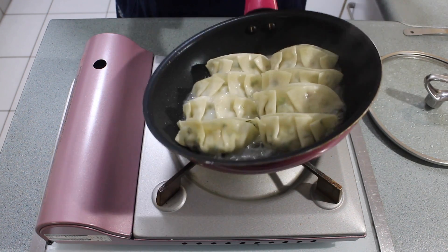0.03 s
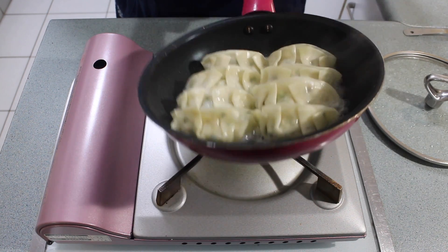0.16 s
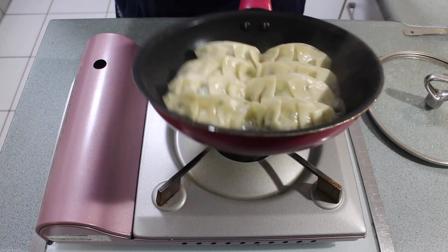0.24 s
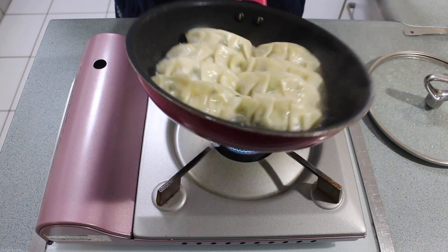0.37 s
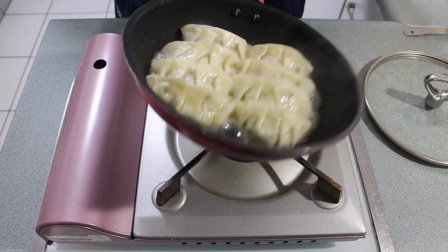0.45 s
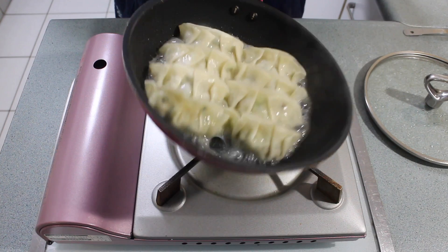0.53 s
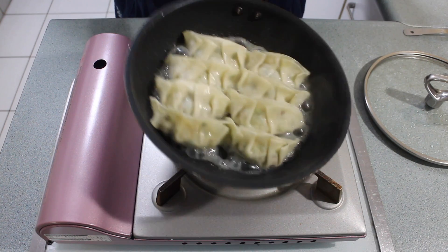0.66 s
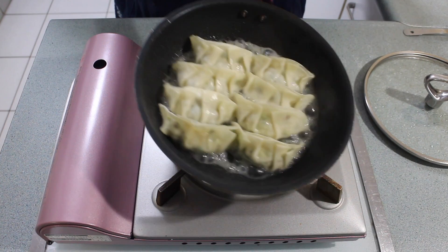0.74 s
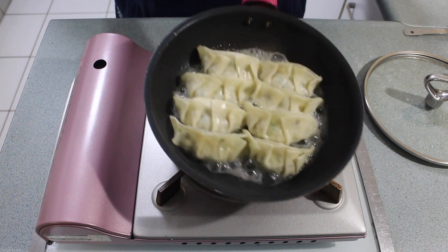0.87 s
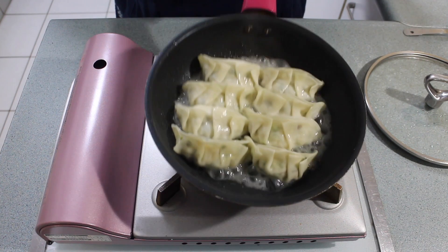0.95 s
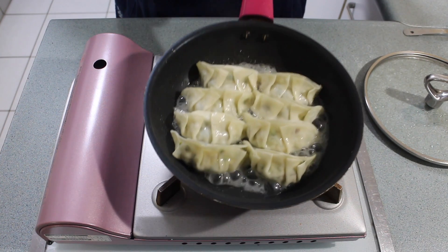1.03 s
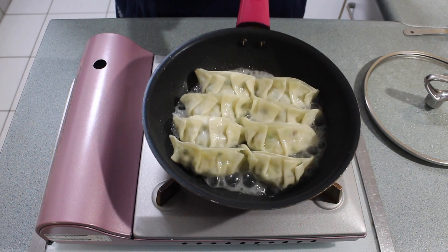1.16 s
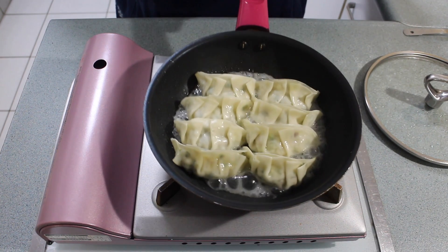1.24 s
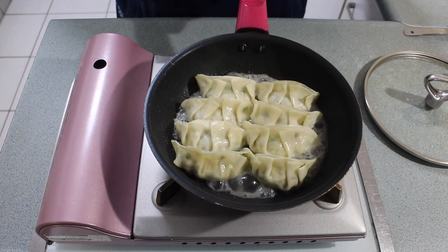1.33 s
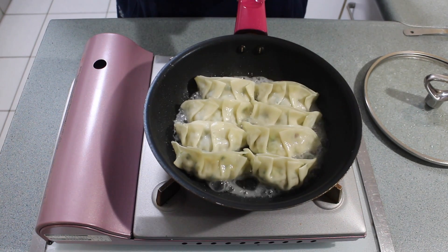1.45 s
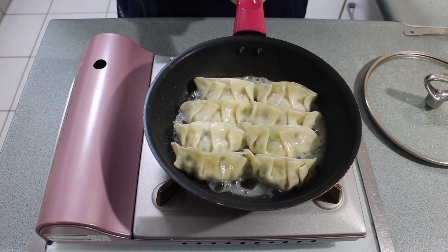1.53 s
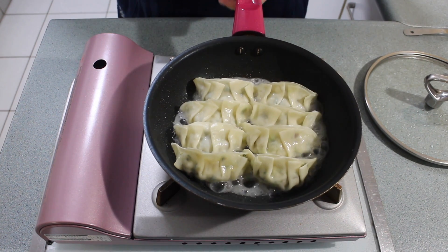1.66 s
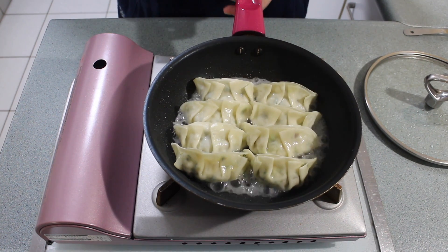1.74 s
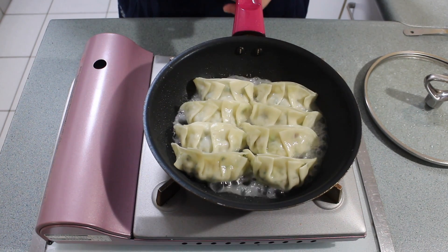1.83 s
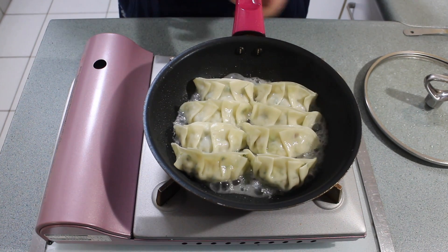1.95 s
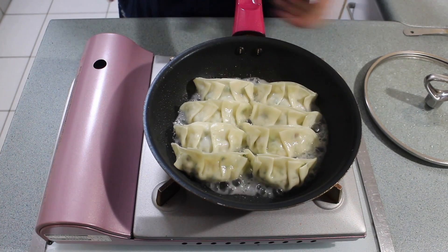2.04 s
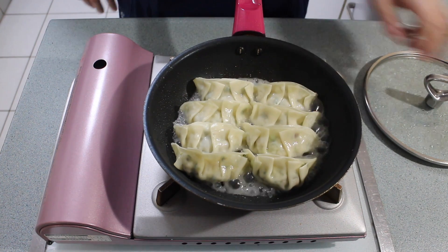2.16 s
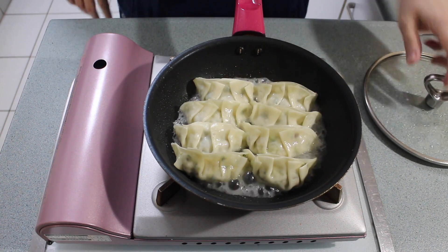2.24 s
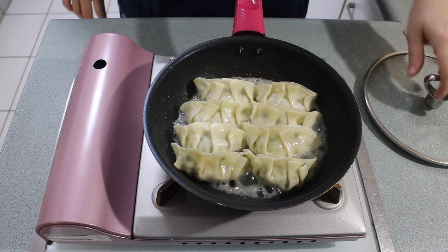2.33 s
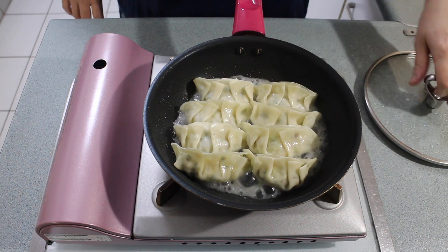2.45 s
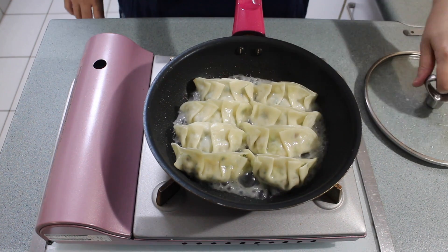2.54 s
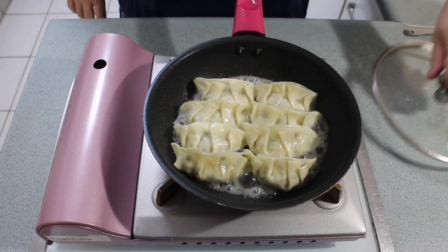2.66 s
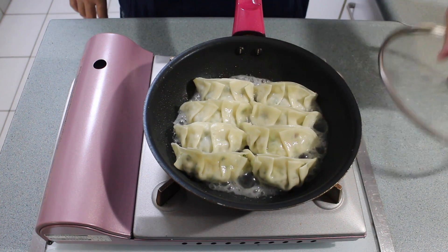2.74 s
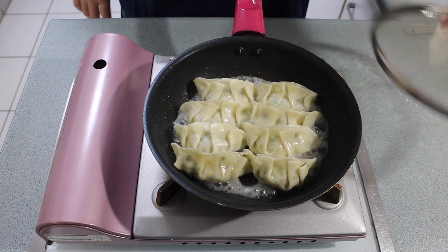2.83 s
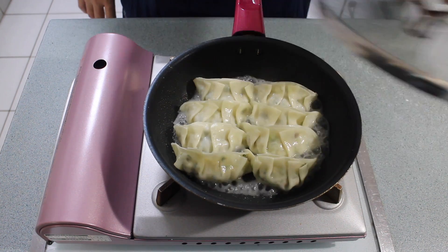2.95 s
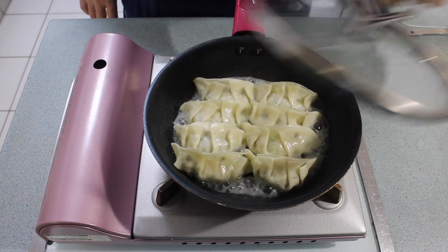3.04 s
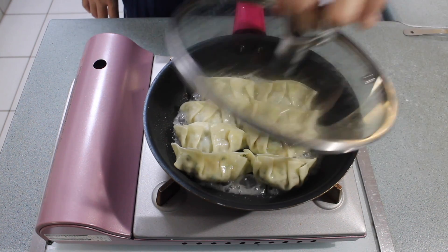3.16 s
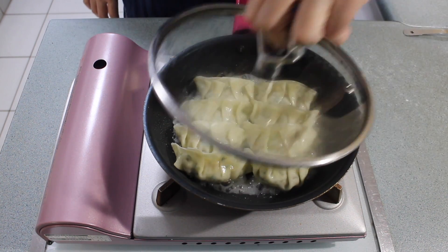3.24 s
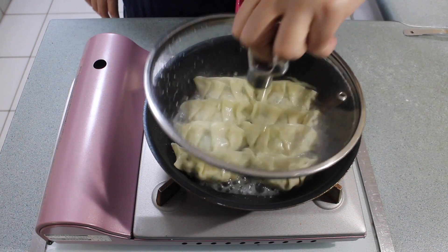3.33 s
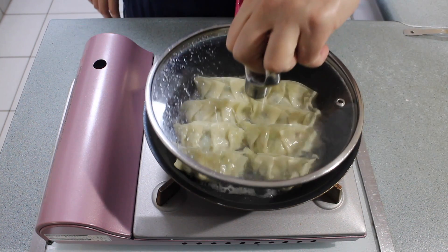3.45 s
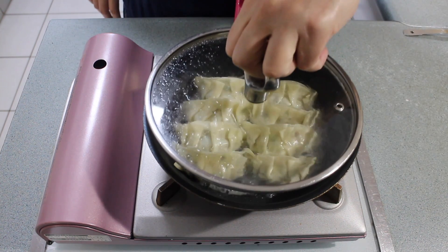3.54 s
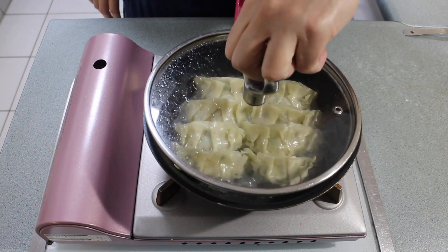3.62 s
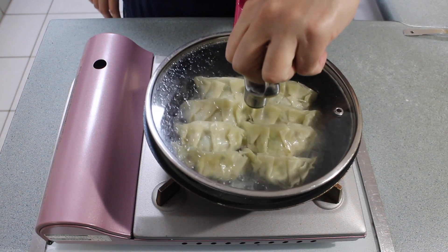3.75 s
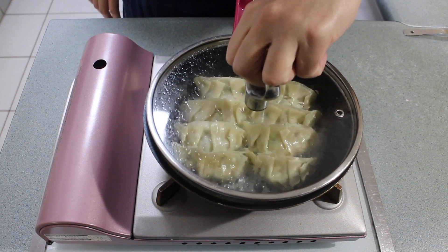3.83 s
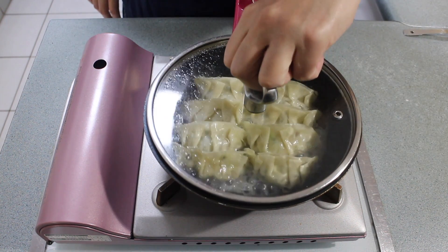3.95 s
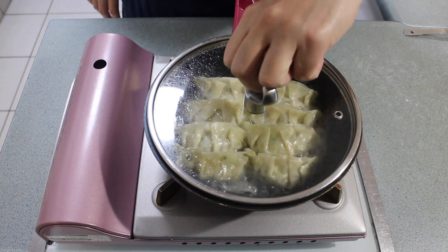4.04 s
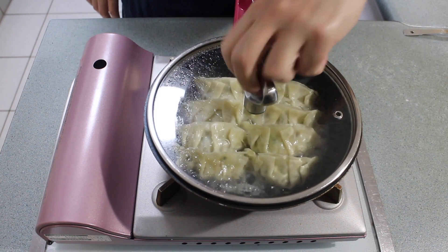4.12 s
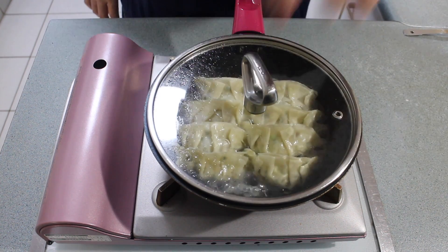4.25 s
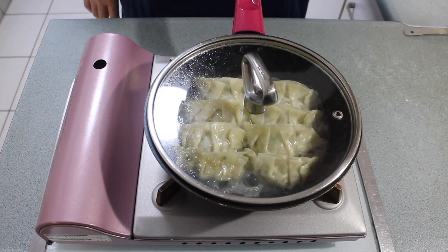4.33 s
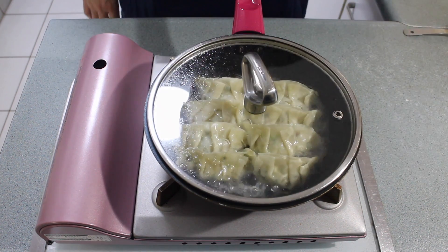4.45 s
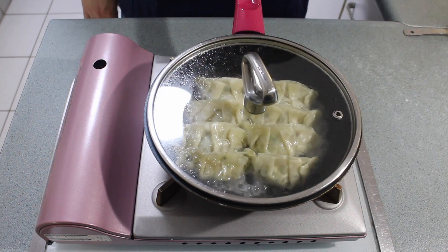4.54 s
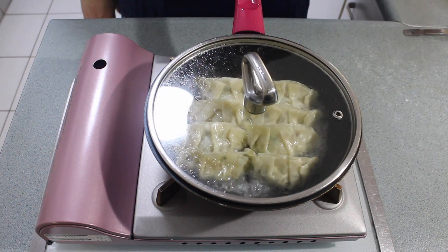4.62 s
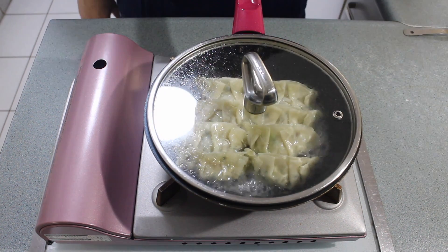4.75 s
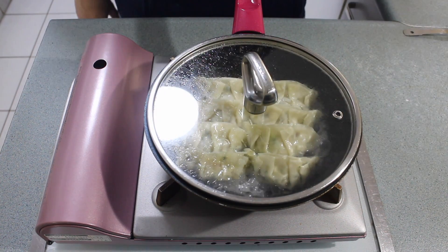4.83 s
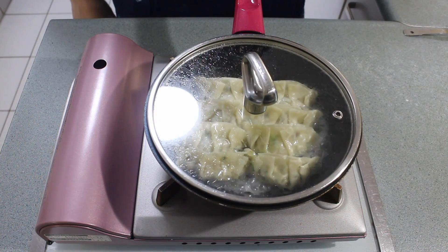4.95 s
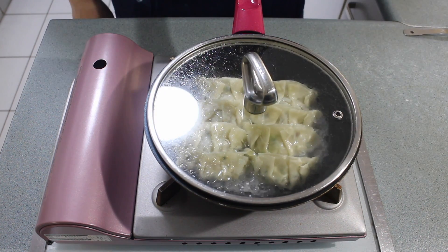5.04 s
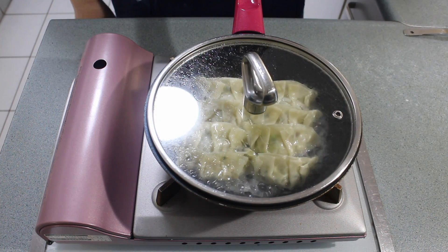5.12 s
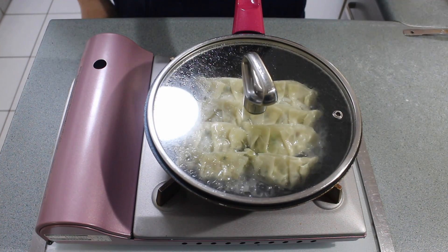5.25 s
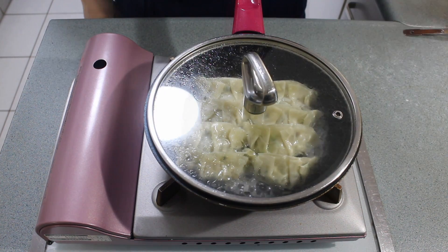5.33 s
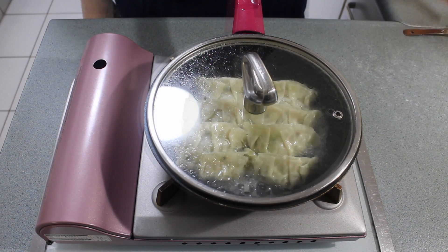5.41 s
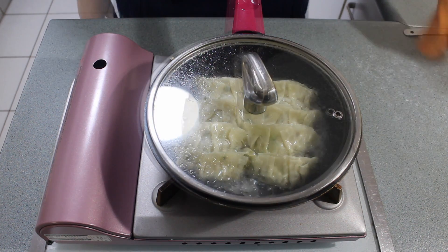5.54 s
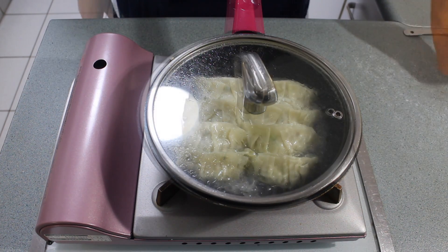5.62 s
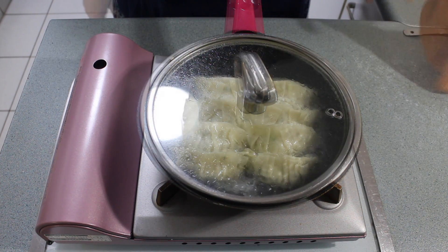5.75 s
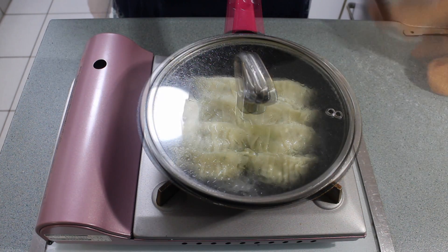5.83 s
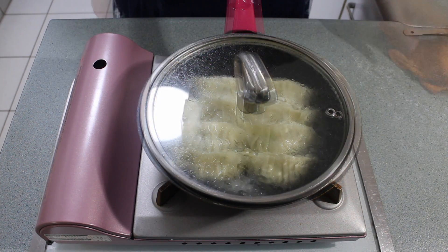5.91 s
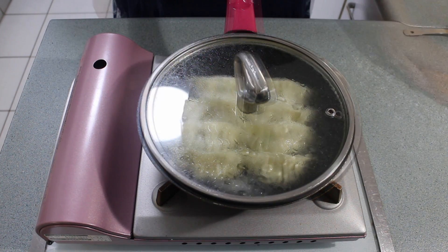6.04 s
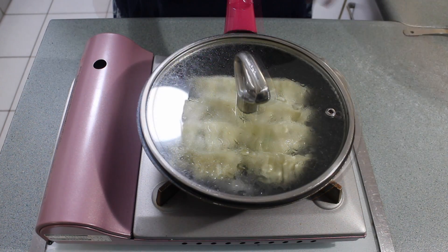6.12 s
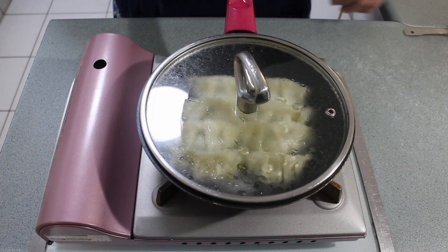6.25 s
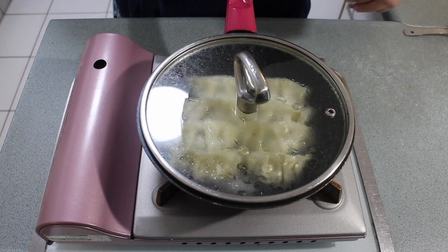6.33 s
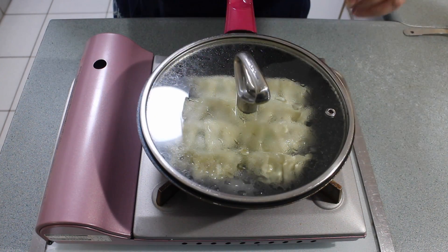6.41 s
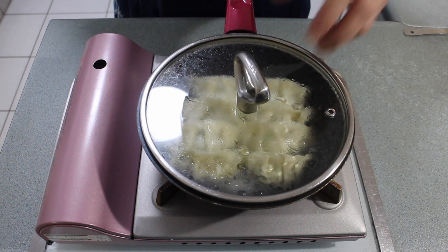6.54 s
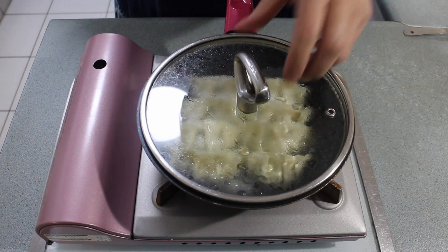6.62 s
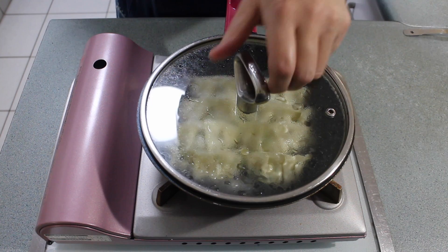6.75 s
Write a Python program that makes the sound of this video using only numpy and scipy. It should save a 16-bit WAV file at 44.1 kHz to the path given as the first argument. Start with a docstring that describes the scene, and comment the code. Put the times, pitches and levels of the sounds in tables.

```python
"""Dumplings frying under a lowered lid

Steam bubbles burst with short rings in a pan of oil and a little water, while the oil crackles and spits.
A glass lid comes down: the hollow under it sinks in pitch as the gap closes, and ringing modes knock.
The boil goes on muffled, hissing and ticking at the lid, while the spitting dies away. Bursts are built
from struck resonances and dying sines, fizz and steam from filtered noise; a faint hum lies beneath."""
import sys
import numpy as np
from scipy import signal
from scipy.fft import rfft, irfft, next_fast_len
from scipy.io import wavfile

SR = 44100
rng = np.random.default_rng(int(sys.argv[2]) if len(sys.argv) > 2 else 0)


def inscribe(sig):
    """Save sig as 16-bit PCM at rate SR to the path in sys.argv[1].

    A 1-D sig is mono; a 2-D sig holds one channel per row.
    Samples are clipped to [-1, 1] before scaling.
    """
    pcm = np.round(np.clip(np.atleast_2d(sig).T, -1, 1) * 32767)
    wavfile.write(sys.argv[1], SR, pcm.astype(np.int16))


N = 298998
TIME = np.arange(N) / SR

SWING_FROM_S, SWING_TAKES_S = 3.12, 0.28  # the lid swings in over the pan
# gaps at which the hollow is half open, and at which the rim is half sealed
HALF_OPEN_CM, SEAL_CM = 0.79, 0.093
BOUNCE_HALF_CM = 3.0  # gap that halves the bounce across the pan


def from_db(db):
    """Decibels to gain."""
    return 10 ** (np.asarray(db) / 20)


def rms_one(x):
    """Scale to an rms of 1."""
    return x / np.sqrt(np.mean(x ** 2) + 1e-20)


def in_time(rows):
    """Each column of a curve table, drawn as straight lines over time."""
    s, *columns = np.transpose(rows)
    return [np.interp(TIME, s, column) for column in columns]


def drift(rate):
    """Slow random wander with an rms of 1, through `rate` random points a second."""
    knots = rng.standard_normal(4096)
    return rms_one(np.interp(TIME * rate, np.arange(len(knots)), knots))


def ramp(start_s, takes_s):
    """Rises evenly from 0 to 1, then stays."""
    return np.clip((TIME - start_s) / takes_s, 0, 1)


def rise_and_fall(start_s, rise_s, fall_s):
    """Swells from 0 to 1 and sinks back."""
    return ramp(start_s, rise_s) - ramp(start_s + rise_s, fall_s)


def high_pass(x, hz, order=1):
    """Roll off the bass below a cut-off."""
    return signal.sosfilt(signal.butter(order, hz, "high", fs=SR, output="sos"), x)


def colour(x, spectrum):
    """Causal (minimum-phase) filter with the given spectrum; the result has rms 1."""
    size = 2 * next_fast_len(N // 2 + SR // 4)
    hz, db = np.transpose(spectrum)
    bins = np.maximum(np.fft.rfftfreq(size, 1 / SR), 1)
    gain = from_db(np.interp(np.log(bins), np.log(hz), db))
    # folding the cepstrum onto positive times gives minimum phase
    cepstrum = irfft(np.log(gain))
    cepstrum[1:size // 2] *= 2
    cepstrum[size // 2 + 1:] = 0
    response = np.exp(rfft(cepstrum))
    return rms_one(irfft(rfft(x, size) * response)[:N])


def resonance(hz, width_hz):
    """Filter coefficients of a resonance with a gain of about 1 at its top."""
    r = np.exp(-np.pi * width_hz / SR)
    feed = (1 - r * r) / 2 * np.array([1, 0, -1])
    return feed, [1, -2 * r * np.cos(2 * np.pi * hz / SR), r * r]


def gliding_resonance(x, hz, width_hz, size=128):
    """A resonance whose centre moves from block to block; rms 1."""
    out, state = np.zeros(N), np.zeros(2)
    for i in range(0, N, size):
        block = x[i:i + size]
        out[i:i + size], state = signal.lfilter(*resonance(hz[i], width_hz), block, zi=state)
    return rms_one(out)


def ring(hz, t60):
    """A sine that has died away by 60 dB after t60 seconds."""
    t = TIME[:int(1.5 * t60 * SR) + 2]
    return np.sin(2 * np.pi * hz * t) * from_db(-60 * t / t60)


def add(track, s, sound):
    """Put a short sound on a track at time s."""
    at = max(round(s * SR), 0)
    track[at:at + len(sound)] += sound[:max(N - at, 0)]


def bursts(per_s, low_hz, high_hz, damping, size_db, clump_db, largest, count=24):
    """Random bursts, many small and few large, in flurries; each rings briefly at one of `count` pitches."""
    born = rng.random(N) < per_s / SR
    sizes = from_db(size_db * np.minimum(rng.exponential(1, N), largest) + clump_db * drift(70))
    clicks = born * sizes * rng.choice([-1, 1], N)
    dealt = rng.integers(0, count, N)
    pitches = np.geomspace(low_hz, min(high_hz, .4 * SR), count)
    out = np.zeros(N)
    for k, hz in enumerate(pitches):
        struck = clicks * (dealt == k) + 1e-18  # the tiny offset keeps the filter state from vanishing
        out += signal.lfilter(*resonance(hz, damping * hz), struck)
    return rms_one(out)


def single_bursts(rows, swell):
    """Large bursts: each bubble's volume swells within `swell` cycles, then rings; pressure is its change."""
    out = np.zeros(N)
    for s, db, hz, cycles in rows:
        volume = ring(hz, max(cycles, 2) / hz)
        volume = volume * (1 - np.exp(-TIME[:len(volume)] * hz / swell))
        pressure = np.diff(volume)
        add(out, s, from_db(db) * pressure / np.abs(pressure).max())
    return out


def echoes(x, decay_s, delay):
    """Dense reflections that die away, even over all pitches, about as strong in all as their source."""
    t = TIME[:SR // 2]
    decay = from_db(-60 * t / decay_s) * (t > delay)
    noise = rng.standard_normal(len(t)) * decay
    # keeping only the phases levels the spectrum
    tail = irfft(np.exp(1j * np.angle(rfft(noise))), len(t)) * decay ** .5
    return signal.fftconvolve(x, tail / np.linalg.norm(tail))[:N]


def lid_within(cm):
    """How closely the lid covers the pan, 0-1: a half when the gap is as wide as given."""
    # The lid's way down to the rim. Each row: time in seconds, height above the rim in cm.
    lid_gap = [(3.1, 13), (3.3, 5.5), (3.45, 5), (3.65, 1.5), (3.82, 1), (3.89, 0.5), (3.98, 0.19),
               (4.04, 0.05), (4.08, 0)]
    gap = np.maximum(in_time(lid_gap)[0], 0)
    return ramp(SWING_FROM_S, SWING_TAKES_S) * cm / (cm + gap)


def fat_bubbles(per_s, spread, size_db, cycles, count=2000):
    """Larger bubbles pop one by one, scattered around a common pitch; rms 1."""
    # The common pitch shifts as the water moves about. Each row: time in seconds, pitch in Hz.
    bubble_pitch = [(0, 1970), (.62, 1645), (.76, 2280), (.87, 1640), (1.05, 1950), (1.7, 1816),
                    (2.7, 1887), (2.95, 2200), (3.25, 2610), (3.5, 1510)]
    chance = rng.random((count, 3))
    times = chance[:, 0] * N / SR
    hz = np.interp(times, *np.transpose(bubble_pitch)) * np.exp(spread * rng.standard_normal(count))
    db = size_db * np.minimum(-np.log(1 - chance[:, 1]), np.pi)
    born = chance[:, 2] < per_s * N / SR / count
    rows = np.column_stack([times, db, hz, np.full(count, cycles)])
    return rms_one(single_bursts(rows[born], swell=0.52))


def bubbling():
    """Steam bubbles burst around the dumplings; the lid first rings with them, then shuts them in."""
    # Boil in the open pan. Each row: frequency in Hz, filter gain in dB.
    open_spectrum = [(60, -24), (130, -46), (200, -19), (290, -13.5), (440, -20), (520, -20), (660, -4),
                     (900, -3.5), (1250, -3.5), (1700, -2), (2500, -2), (3000, -6.5), (3700, -6),
                     (4600, -13.5), (7000, -12.5), (15000, -27)]
    # Simmer under the lid. Each row: frequency in Hz, filter gain in dB.
    covered_spectrum = [(60, -33), (120, -12.5), (180, -7.5), (230, 1.5), (330, -8.5), (465, -12.5),
                        (515, -25), (800, -6), (1000, 1.5), (1250, -2.5), (1380, -9), (1520, -3.5),
                        (1750, -11.5), (1950, -7), (2250, -11.5), (2750, -7.5), (3050, -19), (3500, -8.5),
                        (3750, -22), (4400, -28), (15000, -49)]
    # Rolling boil under the lid once the pan is hot. Each row: frequency in Hz, filter gain in dB.
    rolling_spectrum = [(60, -25), (120, -9.5), (180, -9.5), (240, 0.5), (350, -5.5), (465, -9),
                        (515, -24.5), (850, -7.5), (1120, -1.5), (1270, -5.5), (1500, -9), (1800, -14.5),
                        (2020, -10), (2400, -8), (2880, -17), (3120, -7.5), (3300, -18), (3500, -10.5),
                        (3750, -16.5), (4400, -26), (15000, -44)]
    # Faint ringing of the pan. Each row: frequency in Hz, width in Hz, relative level in dB.
    pan_modes = [(130, 29, -38), (239, 62, -23), (385, 40, -32.5), (452, 44, -34.5), (692, 48, -19),
                 (2600, 99, -29), (3520, 90, -22.5)]
    # Air in the hollow. Each row: Hz when closed, Hz when wide open, width in Hz, relative level in dB.
    air_modes = [(170, 910, 125, -3.0), (1085, 1390, 110, -1.8), (2200, 2320, 130, -17.5),
                 (2640, 2470, 67, -19.5)]
    closed, sealed = lid_within(HALF_OPEN_CM), lid_within(SEAL_CM)
    shut = lid_within(cm=0.45)
    rolling = ramp(start_s=5.56, takes_s=0.28)

    boil = bursts(per_s=4600, low_hz=333.0, high_hz=6000, damping=0.27,
                  size_db=4.0, clump_db=1.64, largest=3.9)
    simmer = bursts(per_s=6500, low_hz=335.0, high_hz=6000, damping=0.21,
                    size_db=4.0, clump_db=1.0, largest=4.16)
    deep = bursts(per_s=3000, low_hz=73.5, high_hz=309, damping=0.34,
                  size_db=2.0, clump_db=0.5, largest=3.0, count=6)
    # the deep bubbles grow by 1 dB as the covered pan heats up
    deep = from_db(-16.0 + 1 * rolling) * deep
    boil, simmer = boil + deep, simmer + deep

    # the air under the lid rings lower and louder as the gap narrows, until the rim seals
    drive = simmer + from_db(-0.5) * boil
    hollow = np.zeros(N)
    for closed_hz, open_hz, width_hz, db in air_modes:
        hz = np.sqrt(closed * closed_hz ** 2 + (1 - closed) * open_hz ** 2)
        hollow += from_db(db) * gliding_resonance(drive, hz, width_hz)
    ringing = from_db(18) * closed * (1 - sealed)

    pan = np.zeros(N)
    for hz, width_hz, db in pan_modes:
        pan += from_db(db) * rms_one(signal.lfilter(*resonance(hz, width_hz), simmer))

    fat = fat_bubbles(per_s=140, spread=0.169, size_db=1.8, cycles=40)
    open_pan = from_db(-1.3) * colour(boil, open_spectrum) + from_db(-5.2) * fat

    gentle_share, rolling_share = np.sqrt(1 - rolling), np.sqrt(rolling)
    covered = gentle_share * colour(simmer, covered_spectrum)
    covered = covered + rolling_share * colour(simmer, rolling_spectrum)
    covered = covered / (gentle_share + rolling_share)  # both share one simmer, so they add up in step
    blips = bursts(per_s=110, low_hz=1950, high_hz=3570, damping=0.029,
                   size_db=3.0, clump_db=0.0, largest=2.0, count=12)
    covered = covered + from_db(-10.5) * blips

    direct = np.sqrt(1 - shut) * open_pan + np.sqrt(shut) * from_db(-1.16) * covered
    # what the hollow takes up is missing from the direct sound
    heard = (direct + ringing * hollow) / np.sqrt(1 + ringing ** 2)
    # the shut-in boil drives the pan harder
    heard = heard + from_db(-2.5 + 2.8 * shut) * pan
    seal_loss_db = 10 * sealed ** 2
    return from_db(-seal_loss_db) * heard


def crackle_level(vigour_db):
    """Crackle in dB follows the boil; the lid screens it, most at a narrow slit, and steam quenches it."""
    usual_db, follows = -41, 0.98  # follows: share of the boil's swings in dB
    slit_loss_db, cover_loss_db, damp_loss_db = 4.5, 4.5, 8.5
    # trapped steam quenches the crackle from 4.27 s on, fast at first
    damp = 1 - np.exp(-np.maximum(TIME - 4.27, 0) / 1)
    slit = lid_within(HALF_OPEN_CM) * (1 - lid_within(SEAL_CM))
    cover = ramp(SWING_FROM_S, SWING_TAKES_S)
    level_db = usual_db + follows * (vigour_db - vigour_db.mean())
    return level_db - slit_loss_db * slit - cover_loss_db * cover - damp_loss_db * damp


def crackling():
    """Tiny drops burst in the oil: sharp ticks over a fizz of noise, in flurries, softer under the lid."""
    # Crackle in the open pan. Each row: frequency in Hz, filter gain in dB.
    open_spectrum = [(300, -5.5), (1500, 8), (3200, -3.5), (4500, -2), (5700, 2), (7300, -4), (8800, -4.5),
                     (10800, -3.5), (13500, -2.5), (16000, -7.5)]
    # Crackle under the lid. Each row: frequency in Hz, filter gain in dB.
    covered_spectrum = [(600, -0.5), (3500, 3.5), (4400, 0), (5300, 0), (5950, 4), (7000, 0), (8700, -2.5),
                        (10800, -2), (14500, -1), (16000, -2.5)]
    shut = lid_within(cm=0.12)
    ticks = bursts(per_s=2400, low_hz=3000, high_hz=13900, damping=0.19,
                   size_db=6.0, clump_db=2.0, largest=4.32, count=10)
    fizz = rng.standard_normal(N)
    flurry_db = 2.1 * np.minimum(drift(150), np.pi / 2)
    open_pan = colour((ticks + from_db(-2.0) * fizz) * from_db(flurry_db), open_spectrum)
    soft_ticks = bursts(per_s=2400, low_hz=3500, high_hz=14100, damping=0.13,
                        size_db=6.0, clump_db=1.5, largest=3.7, count=10)
    covered = (soft_ticks + from_db(3.5) * fizz) * from_db(1.03 * flurry_db)
    covered = colour(covered, covered_spectrum)
    return np.sqrt(1 - shut) * open_pan + np.sqrt(shut) * from_db(1.0) * covered


def low_sounds():
    """A faint mains hum, a sine of wavering phase, and soft bell-shaped puffs of air on the microphone."""
    # Hum, stronger once the pan is covered. Each row: time in seconds, rms level in dB.
    hum_level = [(3.6, -76), (3.9, -65.5), (6.7, -68.5)]
    # Puffs of air. Each row: centre in seconds, relative level in dB, length (bell width) in seconds.
    air_puffs = [(4.184, -42, .02), (4.463, -42, 0.015), (4.58, -39, 0.0073), (4.707, -44, 0.0074),
                 (4.777, -43, 0.0074), (4.834, -40, 0.0088), (4.928, -41, .009), (5.006, -44, 0.01),
                 (5.16, -40, 0.018)]
    hum = rms_one(np.sin(2 * np.pi * 49.9 * TIME + .2 * drift(3.6)))
    puffs = np.zeros(N)
    for s, db, length_s in air_puffs:
        puffs += from_db(db) * np.exp(-.5 * ((TIME - s) / length_s) ** 2)
    return from_db(in_time(hum_level)[0]) * hum + from_db(3.5) * high_pass(puffs, 12)


def small_spits(crackle_db, spread, count=200):
    """Lesser drops at random, following the crackle; the lid takes their edge off. Rows as in spitting()."""
    per_s, over_crackle_db, spread_db, middle_hz = 19, 9.5, 2, 8500
    lid_loss_db = 4 * lid_within(HALF_OPEN_CM)
    chance = rng.random((count, 2))
    scatter = rng.uniform(-0.77, 1, (count, 2))
    times = chance[:, 0] * N / SR
    db = np.interp(times, TIME, crackle_db - lid_loss_db) + over_crackle_db + spread_db * scatter[:, 0]
    hz = middle_hz * np.exp(spread * scatter[:, 1])
    born = chance[:, 1] < per_s * N / SR / count
    return np.column_stack([times, db, hz])[born]


def spitting(crackle_db):
    """Water drops burst in hot oil: a bright snap and a weaker, lower crack of the oil around it."""
    # The loudest drops. Each row: start in seconds, relative peak in dB, pitch of the snap in Hz.
    loud_spits = [(0.018, -22.5, 5770), (0.1603, -20.5, 4260), (0.512, -22, 4120), (0.5255, -28, 5300),
                  (0.612, -33, 3760), (0.873, -23, 4600), (0.909, -23, 8500), (1.256, -23, 6120),
                  (1.2851, -16, 10200), (1.333, -23.5, 3540), (1.76, -22.5, 3870), (1.945, -23.5, 3850),
                  (2.061, -20.5, 5270), (2.2954, -21.5, 3700), (2.349, -16.5, 5100), (2.3831, -22.5, 5860),
                  (2.4045, -22, 9400), (2.4352, -22, 9000), (2.679, -21.5, 3600), (2.7211, -16.5, 5400),
                  (2.786, -25, 3660), (2.8847, -23, 5740), (3.0655, -20.5, 3500), (3.093, -28, 3590),
                  (3.37, -24, 4770), (3.381, -21.5, 5000)]
    drops = np.vstack([loud_spits, small_spits(crackle_db, spread=0.65)])
    snap = single_bursts([(s, db, hz, 7.0) for s, db, hz in drops], swell=0.28)
    crack = single_bursts([(s, db, 0.3 * hz, 3.6) for s, db, hz in drops], swell=0.5)
    return from_db(2.5) * snap + from_db(-9.5) * crack


def popping():
    """Large bubbles ring, each with a lower slap of closing water that the hollow under the lid swells."""
    # The largest bubbles, faint once the lid is on. Each row: start in seconds, relative peak in dB,
    # pitch in Hz, ring in cycles (to -60 dB).
    large_bubbles = [(0.0447, -15.5, 1990, 20), (0.165, -21.5, 2060, 45), (0.1789, -18, 2160, 28),
                     (0.1922, -19, 1880, 27), (0.204, -21.5, 3320, 48), (0.28, -20.5, 1650, 25),
                     (0.3298, -19.5, 1550, 15), (0.389, -19.5, 1700, 36), (0.4381, -21, 1660, 40),
                     (0.4666, -21, 1890, 45), (0.479, -24, 2260, 34), (0.5786, -22.5, 2730, 13),
                     (0.599, -23, 1640, 48), (0.61, -26, 1680, 48), (0.6636, -22.5, 1630, 65),
                     (0.733, -25, 2460, 65), (0.781, -29, 2580, 70), (0.82, -25, 1500, 50),
                     (0.849, -21, 1500, 33), (0.887, -19, 2450, 33), (0.8957, -22, 1680, 27),
                     (0.923, -25, 1745, 50), (1.0228, -16, 2950, 24), (1.0688, -26.5, 2000, 36),
                     (1.1398, -22, 2070, 27), (1.172, -19, 2570, 27), (1.231, -31, 1940, 55),
                     (1.345, -21, 1650, 29), (1.563, -22, 1890, 25), (1.5755, -15.5, 1730, 18),
                     (1.603, -19, 1690, 15), (1.7185, -25, 1690, 48), (1.7694, -23.5, 1710, 27),
                     (1.785, -18, 1920, 16), (1.8, -26, 1930, 46), (1.823, -22, 1910, 33),
                     (1.8464, -21, 2760, 22), (1.8848, -19, 1960, 27), (1.982, -21.5, 2000, 32),
                     (2.224, -31, 2070, 54), (2.271, -27, 1960, 30), (2.282, -31, 1770, 60),
                     (2.3157, -21.5, 1550, 34), (2.331, -36, 1700, 49), (2.369, -29, 1760, 38),
                     (2.418, -25, 1980, 50), (2.438, -21.5, 1620, 24), (2.5284, -22.5, 1900, 30),
                     (2.5702, -26, 2000, 55), (2.587, -22, 2000, 60), (2.639, -24, 2090, 50),
                     (2.664, -12.5, 1620, 18), (2.6734, -18, 1630, 27), (2.682, -23, 1930, 50),
                     (2.7142, -25, 2050, 27), (2.7505, -18, 2030, 22), (2.7634, -22, 1950, 27),
                     (2.999, -24, 1860, 27), (3.034, -26, 3260, 40), (3.046, -25, 3500, 50),
                     (3.119, -28, 2300, 31), (3.181, -21, 1110, 6), (3.2483, -23, 1260, 15),
                     (3.255, -21.5, 2870, 40), (3.275, -16.5, 2000, 9), (3.3072, -19, 2100, 18),
                     (3.317, -25, 3000, 49), (3.365, -30, 1360, 23), (3.397, -29, 820, 12),
                     (3.4326, -39, 1370, 23), (3.44, -25, 1870, 45), (3.501, -22, 1340, 14),
                     (3.511, -20.5, 1350, 15), (3.59, -26, 1350, 12), (3.652, -19.5, 1290, 13),
                     (3.752, -26, 1260, 18), (3.789, -27, 1270, 14), (3.93, -28, 1130, 25),
                     (4.955, -33, 3520, 90), (5.345, -32, 1240, 10), (6.0255, -34, 1100, 8.8),
                     (6.1022, -35, 1140, 16), (6.196, -35, 3500, 71), (6.2914, -30, 1180, 8),
                     (6.532, -34.5, 2290, 40), (6.552, -36, 3050, 40), (6.6595, -34, 1210, 19),
                     (6.7242, -34.5, 1130, 12)]
    rings = single_bursts(large_bubbles, swell=.35)
    slap = single_bursts([(s, db, 0.59 * hz, 4.0) for s, db, hz, _ in large_bubbles], swell=0.33)
    slap_db = -13 + 16 * lid_within(BOUNCE_HALF_CM) * (1 - lid_within(SEAL_CM))
    return from_db(-2.5) * rings + from_db(slap_db) * slap


def knocks():
    """Dull blows set the pan's modes ringing; a soft contact leaves mostly the low ones."""
    # The pan is set on the burner, then the lid lands on the pan. Each row: start in seconds,
    # relative level in dB, hardness of the contact as a low-pass cut-off in Hz.
    blows = [(1.153, -21, 900), (1.172, -21, 905), (1.183, -36, 130.6), (1.272, -36, 130),
             (1.294, -23, 400), (3.858, -12, 3000), (3.8633, -21, 3000), (3.8698, -13, 3000),
             (3.872, -11.5, 2500), (4.04, -12, 130)]
    # Modes of the pan on its burner. Each row: frequency in Hz, relative level in dB, t60 in seconds.
    pan_body = [(145, -30.5, 0.16), (232, -53, 0.038), (748, -16, 0.11), (816, -16.5, 0.027),
                (1155, -5.5, 0.02), (1400, -36, .01)]
    out = np.zeros(N)
    for s, db, contact_hz in blows:
        blow = np.zeros(SR // 4)
        for hz, mode_db, t60 in pan_body:
            add(blow, 0, from_db(db + mode_db) * ring(hz, t60))
        contact = signal.butter(1, contact_hz, fs=SR, output="sos")
        add(out, s, signal.sosfilt(contact, blow))
    return high_pass(out, 130, order=3)


def across_pan(x, count=3):
    """Under the sinking lid the treble bounces from wall to wall: evenly spaced bands that sink a little."""
    open_hz, closed_hz = 687, 645  # round trips a second
    closed, unsealed = lid_within(HALF_OPEN_CM), 1 - lid_within(SEAL_CM)
    # share of the sound that a trip keeps; the bounce stops when the rim seals
    kept = np.clip(0.46 * lid_within(BOUNCE_HALF_CM) * unsealed, 0, .9)
    trip_s = 1 / (open_hz + closed * (closed_hz - open_hz))
    out, bounce = x, x
    for _ in range(count):
        treble = high_pass(bounce, 1900)
        bounce = kept * np.interp(TIME - trip_s, TIME, treble)
        out = out + bounce
    return out * np.sqrt(1 - kept ** 2)


def escaping_steam():
    """Steam splutters out between rim and lid: flickering noise through a double resonance per hiss."""
    # Hisses, highest once the gap is shut. Each row: start, rise and fall in seconds, pitch in Hz,
    # level at the height of the swell in dB.
    hisses = [(3.3, 0.43, 0.27, 5450, -47), (3.895, 0.023, 0.022, 5750, -39.5),
              (4.0, 0.57, 0.34, 10400, -52)]
    jet = rng.standard_normal(N) * from_db(6.4 * drift(150))
    out = np.zeros(N)
    for start_s, rise_s, fall_s, hz, db in hisses:
        slit = resonance(hz, width_hz=1400)
        hiss = rms_one(signal.lfilter(*slit, signal.lfilter(*slit, jet)))
        out += from_db(db) * rise_and_fall(start_s, rise_s, fall_s) * hiss
    return out


def lid_ticks(rattle_t60, rattle_low_hz, rattle_high_hz):
    """Drops spit against the lid with a sharp snap; glass and hollow rattle as a short burst of noise."""
    # Drops on the lid. Each row: start in seconds, peak of the snap in dB, pitch in Hz,
    # ring in cycles (to -60 dB), relative level of the rattle in dB.
    lid_drops = [(4.1147, -17, 8650, 11, -33), (4.2173, -16, 10100, 8.3, -32),
                 (4.346, -14.5, 11500, 12, -26.5), (4.3568, -21.5, 6000, 9.6, -37),
                 (4.3604, -27, 10500, 10, -42), (4.6396, -19.5, 5730, 4.8, -29.5),
                 (4.769, -28, 4500, 5, -38), (4.9115, -26.5, 6350, 42, -51), (5.0272, -22, 11800, 11, -34),
                 (5.0888, -24, 5200, 4, -32), (5.4535, -28, 12000, 8, -39), (5.632, -30, 6000, 4, -41),
                 (5.843, -35, 6000, 4.8, -42)]
    rattle, t = np.zeros(N), TIME[:SR // 20]
    for s, _, _, _, db in lid_drops:
        add(rattle, s, from_db(db - 60 * t / rattle_t60) * rng.standard_normal(len(t)))
    body = signal.butter(1, [rattle_low_hz, rattle_high_hz], "band", fs=SR, output="sos")
    snaps = single_bursts([row[:4] for row in lid_drops], swell=0.15)
    return snaps + from_db(5.0) * signal.sosfilt(body, rattle)


def scene():
    """The pan and the kitchen around it, alike in both channels."""
    # How hard the pan boils. Each row: time in seconds, relative level of the bubbling in dB.
    vigour = [(0, -36), (0.28, -36.5), (0.5, -35.5), (0.87, -34.5), (1.08, -36), (1.26, -35.5),
              (1.43, -37.5), (1.75, -35), (2.05, -35.5), (2.3, -33.5), (2.48, -36.5), (2.67, -35.5),
              (2.83, -37), (3.3, -35), (3.9, -34), (5.35, -33), (5.8, -36.5), (6.25, -33)]
    vigour_db, = in_time(vigour)
    crackle_db = crackle_level(vigour_db)
    pops = popping() + spitting(crackle_db)
    # the loud bursts bounce between the walls of the pan
    pops = pops + from_db(-6.5) * echoes(pops, decay_s=0.022, delay=0.00145)
    boil = from_db(vigour_db - 1.46) * bubbling()
    crackle = from_db(crackle_db) * crackling()
    pan = across_pan(boil + crackle + pops) + escaping_steam() + knocks()
    pan = pan + lid_ticks(rattle_t60=0.016, rattle_low_hz=800, rattle_high_hz=5000)
    kitchen = from_db(-14.5) * echoes(pan, decay_s=0.32, delay=0.0067)
    return np.tile(pan + kitchen + low_sounds(), (2, 1))


def record(dry):
    """A steep elliptic low-pass cuts the top above 15.9 kHz."""
    return signal.sosfilt(signal.ellip(10, .2, 70, 15900, fs=SR, output="sos"), dry)


dry = scene()
out = record(dry)
inscribe(out)
```